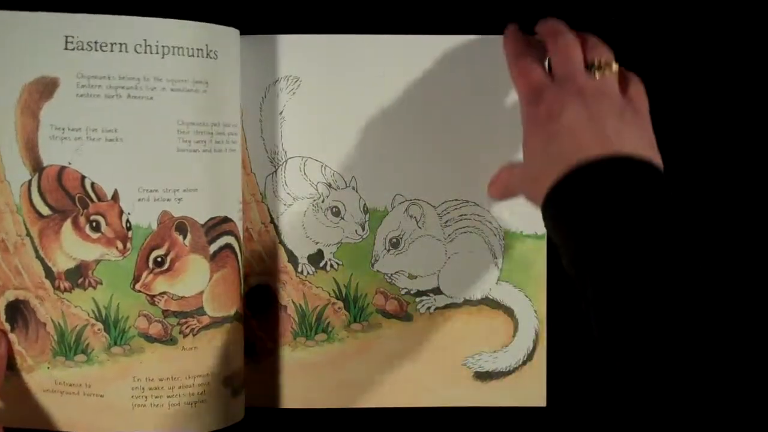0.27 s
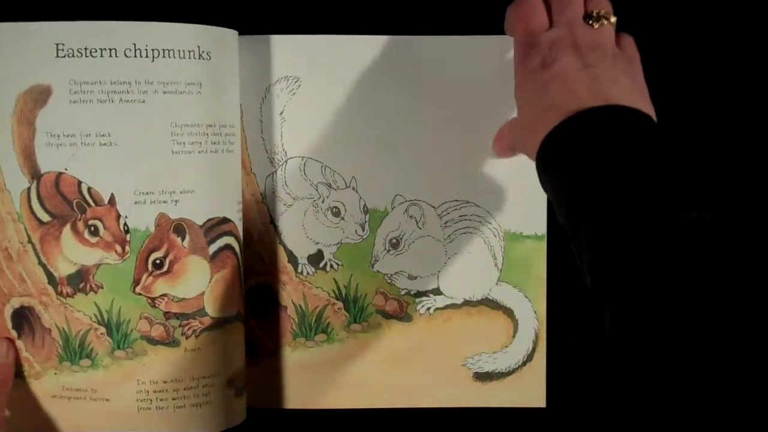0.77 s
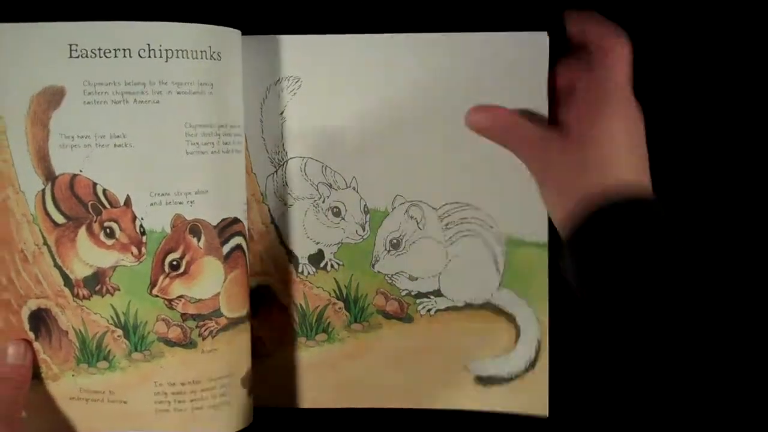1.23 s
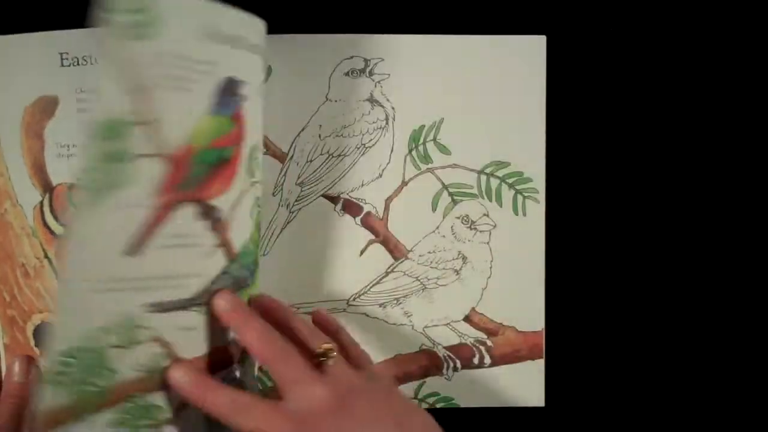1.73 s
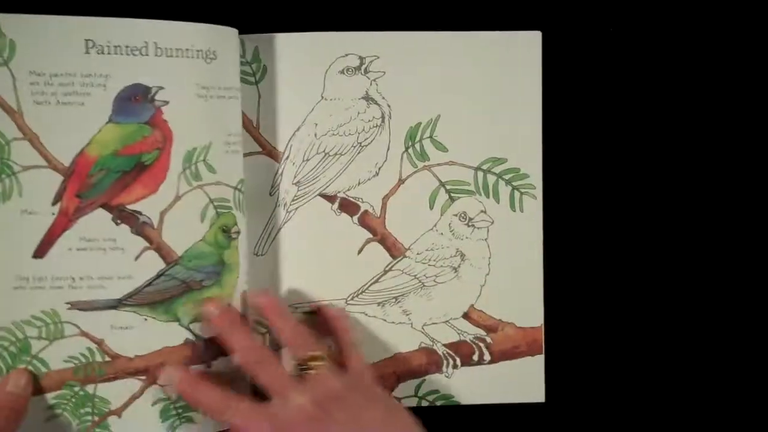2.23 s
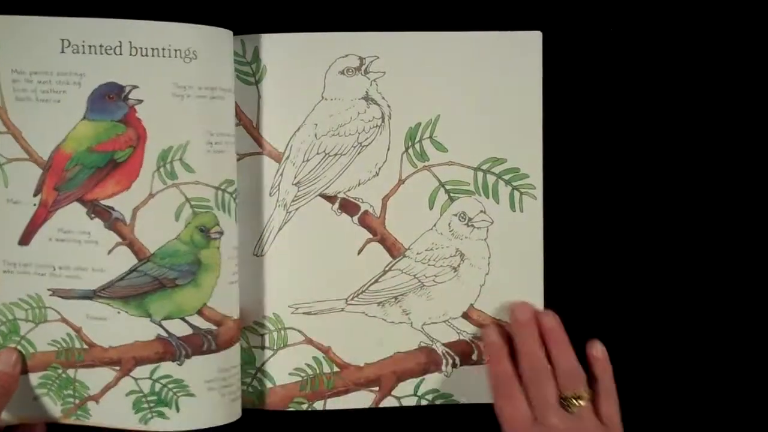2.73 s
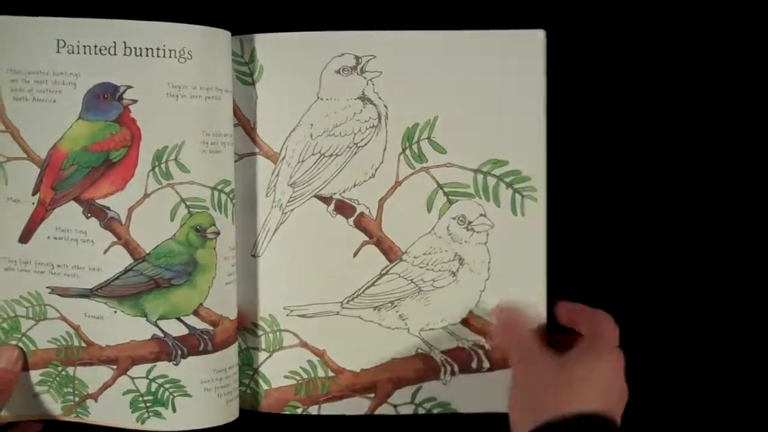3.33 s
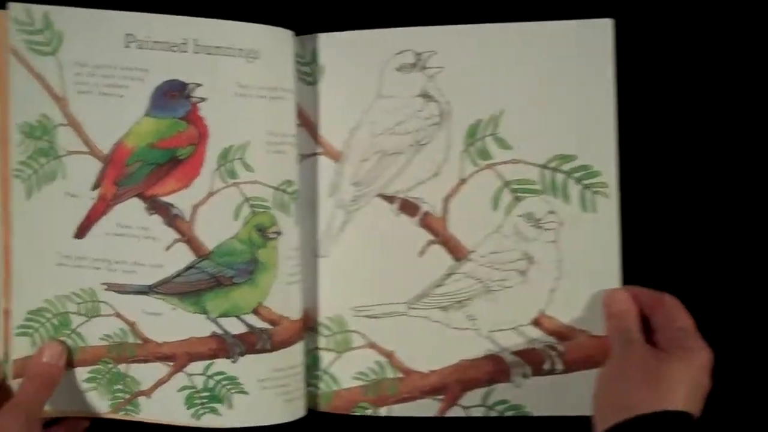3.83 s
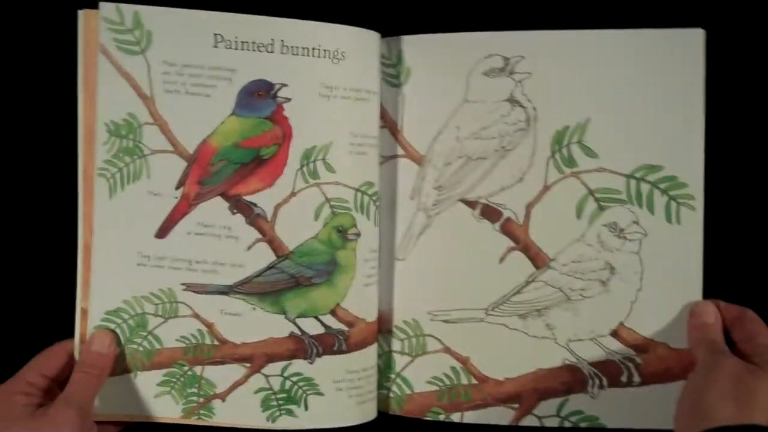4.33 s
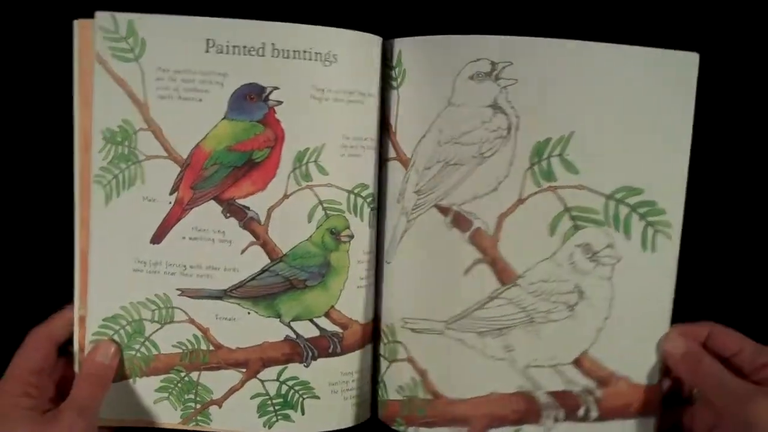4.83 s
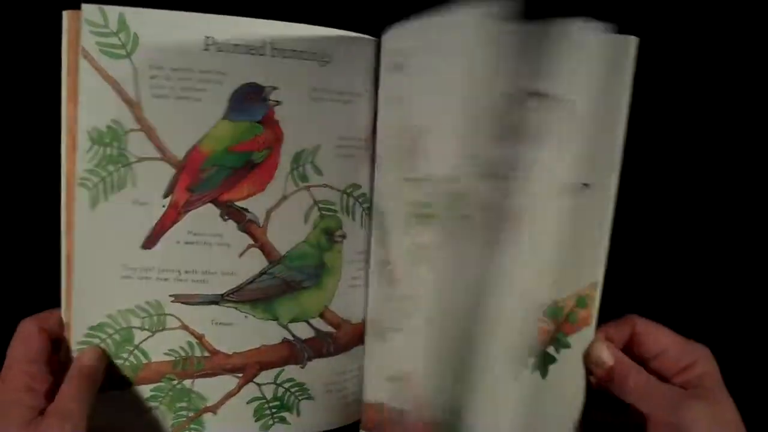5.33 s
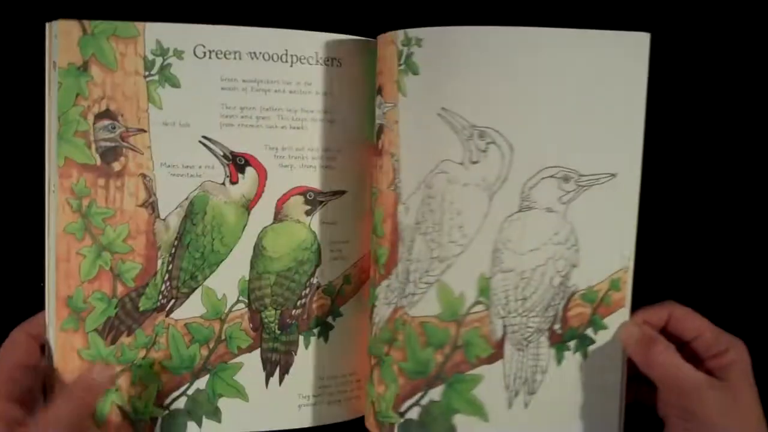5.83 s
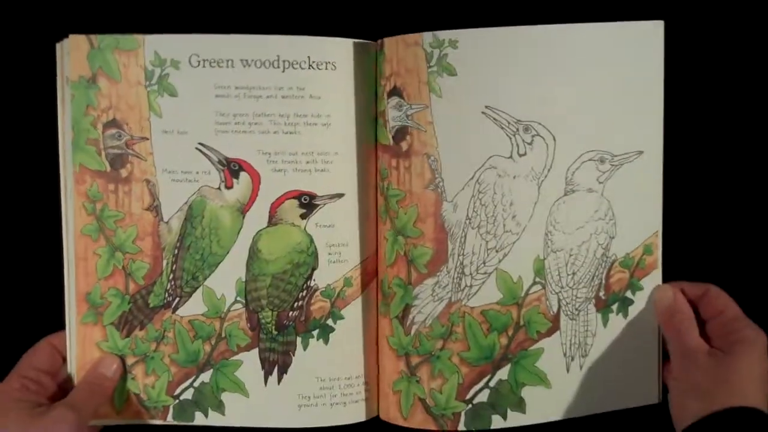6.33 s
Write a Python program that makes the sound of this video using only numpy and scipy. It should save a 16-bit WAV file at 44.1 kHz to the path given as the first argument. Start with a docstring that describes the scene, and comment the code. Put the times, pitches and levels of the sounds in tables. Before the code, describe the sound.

Dry skin-on-paper strokes come in uneven bursts, nearly quiet at about one second, before a loud crisp page flip and crackling creases. Long papery rubs follow, then handling clicks and a duller drag of the whole book. Another leaf turns more softly, ending in small rustles. Close stereo indoors, treble leaning left, short room reflections and faint airy hum.

```python
"""Hands slide over the pages of a large book, pick up a corner, turn the leaf and drag the book over a table.
Early slides and light touches give way to snapping creases, long rubs, a droning drag and small rustles.
Scrapes (bright near 7 kHz), rustles and drones are shaped noise, with sharp blows that ring where a crease snaps.
A microphone pair, more open on the left, hears it with a short echo, in a quiet room with a low hum."""
import sys
import numpy as np
from scipy import signal
from scipy.fft import rfft, irfft, next_fast_len
from scipy.io import wavfile
from scipy.ndimage import uniform_filter1d, map_coordinates

SR = 44100
rng = np.random.default_rng(int(sys.argv[2]) if len(sys.argv) > 2 else 0)


def transcribe(signal):
    """Save signal, clipped to [-1, 1], as a 16-bit WAV file at the path in sys.argv[1]."""
    frames = np.atleast_2d(signal).T
    limited = np.clip(frames, -1, 1)
    pcm = np.round(limited * 32767).astype(np.int16)
    wavfile.write(sys.argv[1], SR, pcm)


N = 290598
T = np.arange(N) / SR  # time of every sample [s]


def strokes():
    """Friction: fibres catch and let go in uneven slips that shake the leaf and the book."""
    # strokes of hand, leaf and book: (start [s], time from start to peak [s], length [s], fade by the end [dB],
    # scrape level [dB], leaf rustle level [dB], book drone level [dB], leaf resonance [Hz],
    # sizzle: scrape boost that grows from 8 to 16 kHz [dB])
    stroke_table = [ (-.1, 0.18, 0.56, 8, -40.5, -64, -74, 1940, -1),
                    (0.203, 0.01, 0.026, 11, -42, -75, -85, 1900, -8),
                    (0.489, 0.048, 0.12, 16, -42.5, -58.5, -67, 1420, -10),
                    (0.611, 0.033, 0.095, 32, -37, -60, -66, 1440, -20),
                    (0.724, 0.032, 0.071, 21, -44, -78, -68, 1700, -33),
                    (0.814, 0.013, 0.18, 3.5, -50, -73, -94, 1900, -1),
                    (1.066, .013, 0.02, 20, -59, -78, -86, 2300, -29),
                    (1.147, 0.0069, 0.016, 13, -59, -82, -87, 2400, -33),
                    (1.181, .005, 0.013, 19, -54.5, -80, -87, 2400, -30),
                    (1.244, 0.03, 0.037, 10, -40, -52, -61, 2660, -21),
                    (1.276, 0.0085, 0.12, 25.5, -29.5, -48, -80, 2480, -19),
                    (1.379, 0.024, 0.063, 1, -40, -57.5, -70, 925, 2),
                    (1.433, 0.018, 0.06, 0.5, -39.5, -52.5, -60, 990, -7),
                    (1.505, 0.0025, 0.039, 7.5, -34.5, -48.5, -30, 1180, 6),
                    (1.534, 0.075, 0.44, 12, -43, -57, -71, 2100, 5),
                    (1.91, 0.065, 0.1, 1, -45, -49, -80, 970, -6),
                    (2.017, 0.011, 0.042, 0, -45, -51.5, -66, 980, -11),
                    (2.07, 0.02, 0.057, 7.5, -36.5, -45.5, -51, 2040, -7),
                    (2.137, 0.016, 0.026, 12, -40, -43.5, -68, 1940, 4),
                    (2.175, 0.018, 0.059, 3, -45.5, -52, -67, 2510, -3),
                    (2.235, 0.009, 0.073, -6.5, -54.5, -64, -70, 2550, -9),
                    (2.329, 0.089, 0.31, 18.5, -35.5, -52.5, -66, 2780, 3.5),
                    (2.584, 0.051, 0.46, 6.5, -39, -55, -68.5, 2780, 6.5),
                    (3.075, 0.0072, 0.2, 0.5, -49, -60, -70, 2940, -3),
                    (3.3, .005, 0.06, -3, -62, -86, -79, 2530, 6),
                    (3.346, 0.01, 0.083, 20, -48, -54, -55.5, 2290, 3),
                    (3.432, 0.021, 0.041, 15.5, -39.5, -43.5, -50.5, 990, -10),
                    (3.485, .005, 0.046, -4, -61, -76, -80, 2200, 20),
                    (3.556, 0.0027, 0.06, 2, -48.5, -55, -56.5, 1980, -16),
                    (3.653, .01, 0.049, -7, -62.5, -63.5, -68, 2300, -16),
                    (3.697, 0.023, 0.57, 1.5, -43, -49, -48, 2570, 8.5),
                    (4.164, 0.047, 0.08, 2.5, -39.5, -67, -54, 2160, -2),
                    (4.279, 0.01, 0.34, 14, -44.5, -50.5, -49.5, 2940, 4),
                    (4.396, 0.072, 0.13, 4.5, -46, -51.5, -77, 3940, 0),
                    (4.51, 0.033, 0.12, 2.5, -61, -61.5, -60.5, 2000, -2),
                    (4.639, .04, 0.11, 12, -51.5, -65.5, -66, 1240, -9),
                    (4.866, 0.08, 0.4, 7, -45.5, -57.5, -64, 1540, -7),
                    (5.161, 0.036, 0.038, 1, -48.5, -52, -58, 1920, -7),
                    (5.213, 0.0087, 0.068, 4.5, -50.5, -51, -66, 1010, -20),
                    (5.304, 0.015, 0.04, 10, -57, -54, -63, 1090, -1),
                    (5.341, 0.015, 0.023, 1.5, -47.5, -50.5, -77, 1100, -5),
                    (5.376, 0.0037, 0.012, 9, -58, -47.5, -75, 1730, -3),
                    (5.49, 0.028, 0.1, 0.5, -48, -51, -86, 1700, -5),
                    (5.576, 0.004, 0.072, 18, -41.5, -50.5, -51.5, 1770, -7),
                    (5.684, 0.057, 0.075, 10, -57, -67, -67, 1900, -13),
                    (5.768, 0.017, 0.024, 13, -52, -67, -64, 1900, -9),
                    (5.836, .01, 0.019, 14, -59, -63, -62, 1910, -9),
                    (6.011, .005, 0.065, 3, -51.5, -59, -61.5, 1940, -15),
                    (6.063, 0.0098, 0.033, 4.5, -43.5, -49.5, -63, 2020, 3),
                    (6.13, 0.0037, 0.14, 15, -51, -54.5, -72, 1820, -14),
                    (6.28, 0.047, .12, 5, -50.5, -61.5, -66, 1530, -1),
                    (6.392, 0.035, 0.15, -1, -54, -53, -60, 1360, -5), ]
    # basic colour of the scrape: (frequency [Hz], relative level per Hz [dB])
    scrape_colour = [(1760, -19.5), (3000, -12), (3900, -10), (4900, -5.5), (6000, -3), (6920, -5),
                     (9540, -14), (11800, -21.5), (13700, -19.5), (14300, -70)]
    # changing colour of the scrape: (time [s], resonance [Hz], body: boost that grows from 6 down to 3 kHz [dB])
    skin_path = [(0, 7570, -2), (.45, 7340, -2), (.7, 7400, 1.5), (1.0, 7450, -2.5), (1.3, 7260, 1),
                 (1.45, 7700, -6), (1.8, 7400, 3.5), (2.1, 7350, 4.5), (2.45, 7340, 0.5), (2.9, 6920, 5),
                 (3.25, 6900, 5.5), (3.45, 6900, 4), (3.75, 7400, 2), (4.2, 7100, -1.5), (4.5, 7400, 7),
                 (4.7, 6760, 0.5), (5.3, 7400, 1), (5.9, 7260, 8.5), (6.59, 7130, 6.5)]
    # basic colour of the rustle: (frequency [Hz], relative level per Hz [dB])
    rustle_colour = [(150, -15), (350, -6.5), (1000, 1.5), (2200, -2), (3600, -7.5), (5000, -7),
                     (7600, -61)]
    # the bent leaf hums along: (multiple of its resonance [-], lift [dB])
    leaf_tones = [(1, 12), (2, 8), (3, 4)]
    # resonances of the book on the table: (frequency [Hz], width [Hz], relative level [dB])
    book_modes = [(575, 50, -6), (648, 28, -3), (738, 26, 3), (835, 36, -8), (905, 80, -9)]

    rows = np.array(stroke_table)
    power = np.array([contact(*row[:4]) ** 2 for row in rows])
    # overlapping strokes add up as power
    scrape_gain, rustle_gain, drone_gain = np.sqrt(amp(rows[:, 4:7].T) ** 2 @ power)
    peak_s = rows[:, 0] + rows[:, 1]
    leaf_hz, sizzle_db = rows[:, 7], rows[:, 8]
    skin_s, skin_hz, body_db = np.transpose(skin_path)

    # dull scrapes jump in lumps: 0.13 dB of stutter per dB of lost sizzle
    coarse_db = 0.13 * np.clip(-np.interp(T, peak_s, sizzle_db), 4, 30)
    slips = amp(coarse_db * wobble(400))
    crackle = 1 + 1.5 * np.clip(wobble(900) - 2.2, 0, None)  # now and then a fibre pops

    # the stroke with the loudest rustle sets the leaf's pitch
    rustle_power = amp(rows[:, 5:6]) ** 2 * power[:, ::64]
    held_hz = leaf_hz[np.argmax(rustle_power, axis=0)]

    def hump(hz, centre, octaves):
        """A smooth bump around a centre frequency."""
        return np.exp(-(np.log2((hz + 1) / centre) / octaves) ** 2)

    def leaf_lift(hz, s):
        """The leaf's tones move with its pitch [dB]."""
        pitch = np.interp(s, T[::64], held_hz)
        return sum(db * hump(hz, k * pitch, octaves=0.24 / k) for k, db in leaf_tones)

    def skin_lift(hz, s):
        """Resonance, body and sizzle of the scrape change over time [dB]."""
        resonance = 8.53 * hump(hz, np.interp(s, skin_s, skin_hz), octaves=0.17)
        body = np.interp(s, skin_s, body_db) * np.clip(np.log2(6000 / (hz + 1)), 0, 1)
        sizzle = np.interp(s, peak_s, sizzle_db) * np.clip(np.log2((hz + 1) / 8000), 0, 1)
        return resonance + body + sizzle

    def scrape_response(hz):
        """The scrape has hardly any bass."""
        return amp(along([(400, -78)] + scrape_colour, hz))

    def rustle_response(hz):
        """The rustle is strongest in the middle of the range."""
        return amp(along(rustle_colour, hz))

    def drone_response(hz):
        """The book resonates; the table passes only the middle of the drone."""
        return modes(book_modes)(hz) * modes([(750, 650, 0)])(hz)

    scrape = scrape_gain * rush(scrape_response, patchy_db=2.1, slips=slips, moving=skin_lift)
    rustle = rustle_gain * rush(rustle_response, patchy_db=0.5, slips=slips * crackle, moving=leaf_lift)
    drone = drone_gain * rush(drone_response, patchy_db=0.5, alike=[(700, 1.0)])
    return scrape + rustle + drone


def contact(start, swell, length, fade_db):
    """Gain of one stroke: touch, swell to the peak, fade, lift."""
    touch_s, lift_s = 0.023, 0.074  # contact begins before the start; lifting loses 30 dB in lift_s
    swell_db, fade_bend = 9, 1.07  # rise from start to peak [dB]; the fade steepens toward the end
    t = T - start
    rise_db = np.interp(t, [-touch_s, 0, swell], [-40, -swell_db, 0])
    fall_db = fade_db * np.clip((t - swell) / max(length - swell, 1e-3), 0, 1) ** fade_bend
    lift_db = 30 * np.clip(t - length, 0, None) / lift_s
    return amp(rise_db - fall_db - lift_db) * (t > -touch_s)


def snaps():
    """Each crease lets go at once or in a short crunch, and shakes the leaf and the pages below."""
    # creases that snap: (time [s], relative strength [dB], crack of the leaf against it [dB],
    # low knock against it [dB], time for the main crunch to fall by 60 dB [s])
    snap_table = [(0.6386, -38, -27, -27, 0.0094), (1.029, -42, -9, -41, 0.03),
                  (1.067, -37, -22, -39, 0.039), (1.2846, -17.5, -35, -57, 0.0097),
                  (1.3, -22, -36, -49, 0.007), (1.4988, -26, -4, -25, 0.016), (1.5067, -31, -7, 5, 0.025),
                  (2.1084, -24, -5, -27, 0.015), (2.155, -43, 3, -6, 0.03), (2.196, -39, 6, -10, 0.008),
                  (2.327, -19.5, -4, -16, 0.0016), (2.3297, -27, -30, -10, 0.018),
                  (2.708, -52, -7, 13, 0.0054), (3.122, -19, 4, -31, 0.0022), (3.132, -42, 2, -20, .01),
                  (3.419, -45.5, 11, -14, 0.0079), (3.442, -36, 5, -23, .003), (3.4558, -24, -3, -25, .003),
                  (3.462, -35, 1, -21, 0.0038), (3.612, -28.5, -12, -16, 0.0025),
                  (5.2835, -30.5, 0.5, -17, 0.0027), (5.3159, -39, 8.5, -20, 0.016),
                  (5.3866, -39.5, -14, -4, 0.014), (5.584, -30, 2, -9, 0.0062),
                  (5.592, -38, 5, -28, 0.0098), (5.8796, -38.5, -25, -29, 0.013),
                  (5.954, -46, -5, -6, 0.037), (6.019, -30.5, -8, -20, 0.008), (6.071, -26, 2, -19, 0.0017),
                  (6.207, -35, -6, -30, .006)]
    # the fold rings: (frequency [Hz], width [Hz], relative level [dB])
    crease_modes = [(7230, 296, 9)]
    # the leaf around it: (frequency [Hz], width [Hz], relative level [dB])
    leaf_modes = [(1860, 4800, -1.5), (3240, 1470, 5.5)]
    # the pile of pages below: (frequency [Hz], width [Hz], relative level [dB])
    knock_modes = [(439, 98, 1.5), (860, 150, 1.5)]
    # the sharp edge of a quick release: (frequency [Hz], width [Hz], relative level [dB])
    click_modes = [(5830, 1600, 4)]
    quick_s = 0.0032  # a crease that lets go faster than this crunches less
    soft_hz = 9000  # paper is too soft to ring much above this

    blows = np.zeros((4, N + SR))  # blows to crease, leaf, pages and sharp edge
    t = T[:SR // 20]
    chance = rng.standard_normal((len(snap_table), len(t)))
    for (s, db, crack_db, knock_db, t60), noise in zip(snap_table, chance):
        fading = 0.19 * amp(-60 * t / t60) + 0.051 * amp(-60 * t / 0.081)
        burst = noise * min(1, t60 / quick_s) * fading
        burst[0] = min(1, 0.0025 / t60)  # a quick release is one sharp blow
        start = round((s + 0.00066) * SR)
        blows[3, start] = amp(db + 14) * burst[0] ** 2
        blow_db = db + np.array([[22], [crack_db + 13.0], [knock_db + 25.5]])
        blows[:3, start:][:, :len(t)] += amp(blow_db) * burst

    def ringing(table):
        """Resonances heard through soft paper."""
        return lambda hz: modes(table)(hz) / (1 + 1j * hz / soft_hz) ** 4

    tables = (crease_modes, leaf_modes, knock_modes, click_modes)
    return sum(filtered(blow[:N], ringing(table)) for blow, table in zip(blows, tables))


def room(x):
    """The walls answer, each frequency dying at its own speed."""
    # echo: (frequency [Hz], time to fall by 60 dB [s])
    echo_times = [(300, 0.061), (2000, 0.28), (10000, 0.025)]
    hz, t, z = signal.stft(rng.standard_normal((2, SR // 3)), SR, nperseg=256)
    fading = amp(-60 * t / along(echo_times, hz)[:, None])
    tail = signal.istft(z * fading, SR, nperseg=256)[1]
    tail = tail / np.linalg.norm(tail[0])
    delayed = np.pad(x, ((0, 0), (150, 0)))  # 150 samples later
    return signal.fftconvolve(delayed, tail, axes=1)[:, :N]


def room_tone():
    """Steady air noise and a few narrow, wavering hums, made of noise through narrow resonances."""
    # colour of the air noise: (frequency [Hz], relative level per Hz [dB])
    air_colour = [(12, -48), (20, -12), (113, -4.5), (657, -7), (865, -3.5), (1380, -7.5), (1580, -7),
                  (3150, -12), (5770, -12.5), (7190, -7.5), (8480, -17), (12100, -20), (14200, -22),
                  (14350, -70)]
    # air noise in the two channels: (frequency [Hz], left-right likeness [-1 to 1])
    air_alike = [(30, 0.021), (70, 0.63), (300, 0.4), (1500, 0.29), (6000, 0), (14000, 0.22)]
    # wavering hums: (frequency [Hz], width [Hz], rms level [dB])
    hum_table = [(93.5, 2.7, -78.5), (136.9, 4.8, -69.5), (345, 51, -75)]
    air_db = -59  # rms level
    hum = sum(amp(db) * rush(modes([(hz, width, 0)]), patchy_db=1.6) for hz, width, db in hum_table)
    air = rush(lambda hz: amp(along(air_colour, hz)), patchy_db=2.0, alike=air_alike)
    return amp(air_db) * air + hum


def rush(response, patchy_db, slips=1, alike=None, moving=lambda hz, s: 0):
    """Stereo noise of rms 1: common slips, streaks of random gain, a moving and a fixed colour."""
    # usual stereo image: (frequency [Hz], left-right likeness [-1 to 1])
    usual_alike = [(300, 0.99), (1000, 1), (2400, 0.85), (6000, 0.61), (15000, 0)]
    likeness = usual_alike if alike is None else alike
    hz, s, z = signal.stft(slips * rng.standard_normal((2, N)), SR, nperseg=512)
    # blur random gains over frequency, then over time
    field = uniform_filter1d(rng.standard_normal(z.shape[1:]), size=4, axis=0)
    field = uniform_filter1d(field, size=14, axis=1)
    gain_db = patchy_db * unit(field) + moving(hz[:, None], s)
    pair = signal.istft(z * amp(gain_db), SR, nperseg=512)[1][:, :N]

    def mid_side_response(hz):
        """More side noise makes left and right less alike."""
        turn = np.arccos(np.clip(along(likeness, hz), -1, 1)) / 2
        return response(hz) * [np.cos(turn), np.sin(turn)]

    mid, side = filtered(pair, mid_side_response)
    return unit(np.array([mid + side, mid - side]))


def modes(table):
    """Response of a set of resonances that ring only after they are struck."""
    def response(f):
        """Sum of resonances with alternating sign."""
        return sum((-1) ** k * amp(db) * 1j * f * width / (centre * centre - f * f + 1j * f * width)
                   for k, (centre, width, db) in enumerate(table))
    return response


def filtered(x, response):
    """Sound x with its spectrum multiplied by a response of frequency."""
    m = next_fast_len(N + SR // 2)
    return irfft(rfft(x, m) * response(np.fft.rfftfreq(m, 1 / SR)), m)[..., :N]


def wobble(rate):
    """A smooth random curve with rate random points a second."""
    return map_coordinates(rng.standard_normal(int(N * rate / SR) + 4), [T * rate])


def along(points, hz):
    """Values read between (frequency [Hz], value) points on a logarithmic frequency axis."""
    f, v = np.transpose(points)
    return np.interp(np.log(hz + 1), np.log(f + 1), v)


def unit(x):
    """Scaled to rms 1."""
    return x / np.sqrt(np.mean(x ** 2) + 1e-20)


def amp(db):
    """Decibels to gain."""
    return 10 ** (np.asarray(db) / 20)


def scene():
    """Book sounds with their echo, over the room tone."""
    book = strokes() + snaps()
    return book + amp(-18.5) * room(book) + room_tone()


def record(dry):
    """The right port is shaded in the treble; nothing passes above the band limit."""
    # balance of the pair: (frequency [Hz], left above right [dB])
    left_lift = [(60, -3.5), (180, 3), (600, 2), (1640, 1.5), (4960, 3.5), (15000, 11.5)]
    top_hz = 15560
    side = np.array([[.5], [-.5]])  # half the difference up on the left, half down on the right
    return filtered(dry, lambda hz: amp(side * along(left_lift, hz)) * (hz < top_hz))


dry = scene()
out = record(dry)
transcribe(out)
```